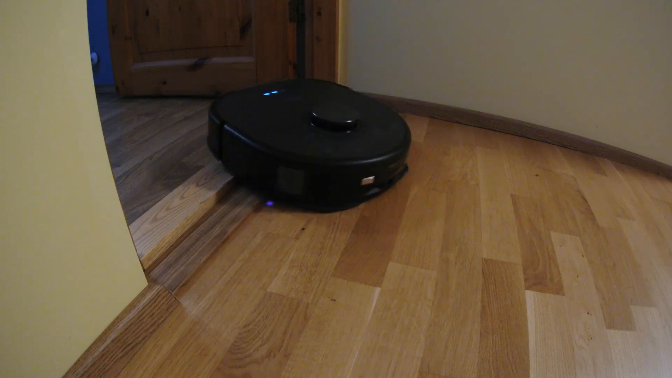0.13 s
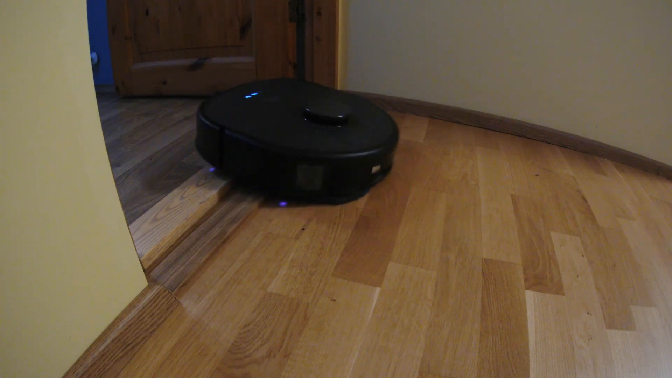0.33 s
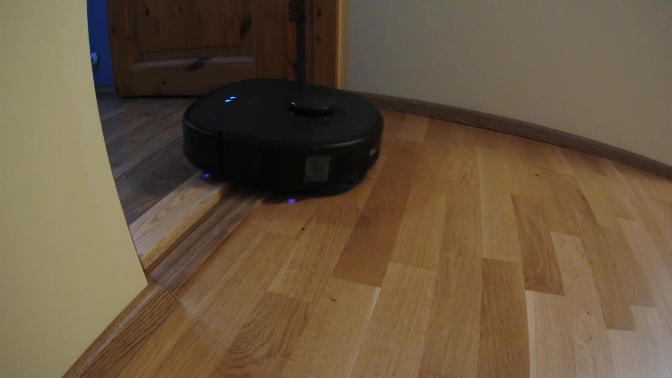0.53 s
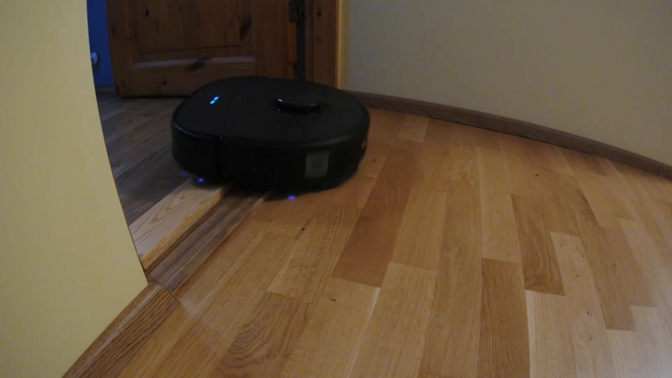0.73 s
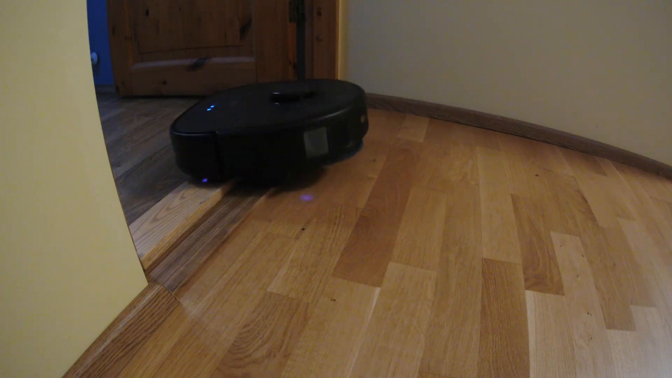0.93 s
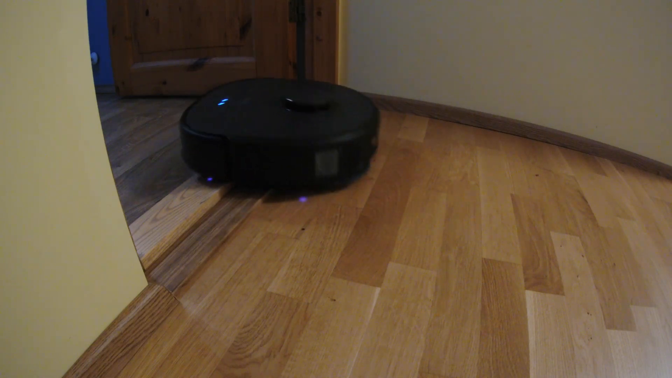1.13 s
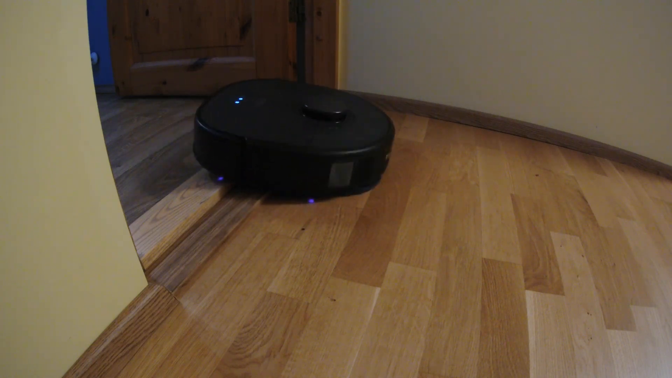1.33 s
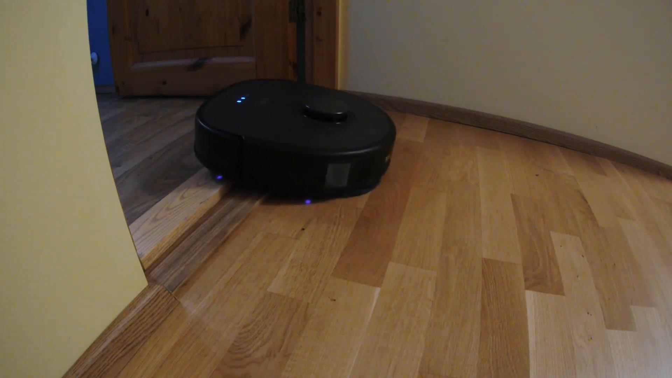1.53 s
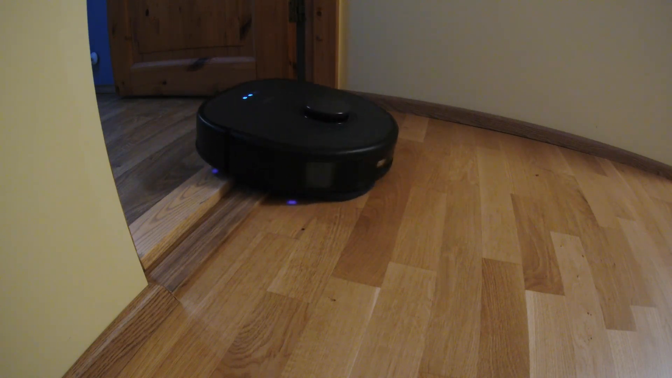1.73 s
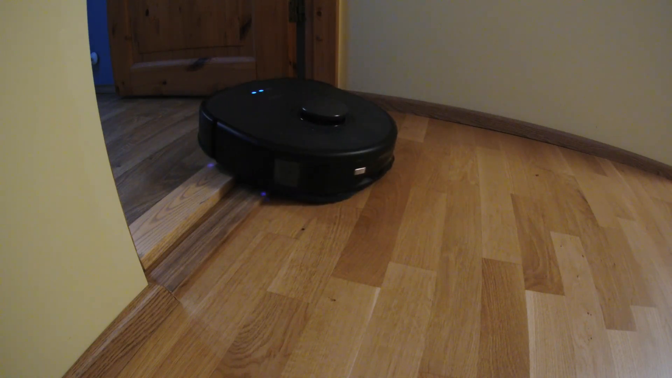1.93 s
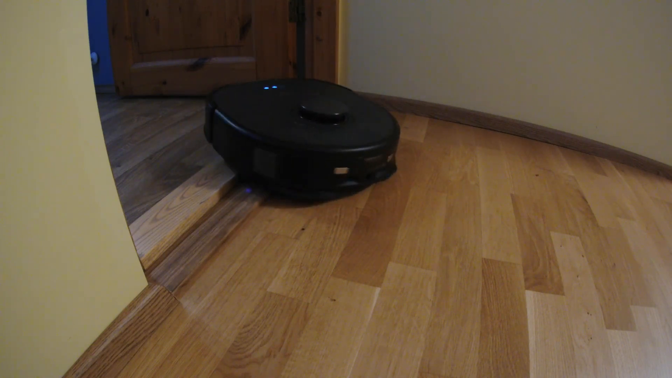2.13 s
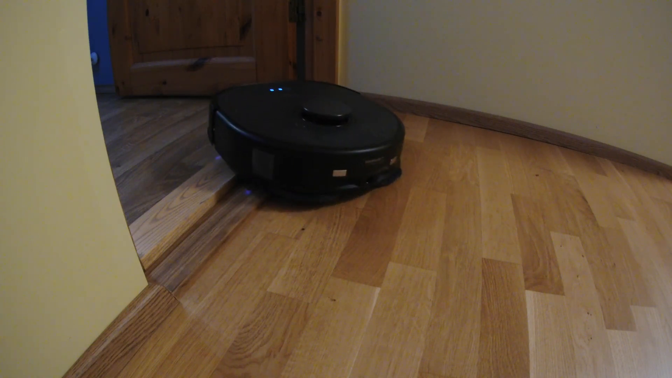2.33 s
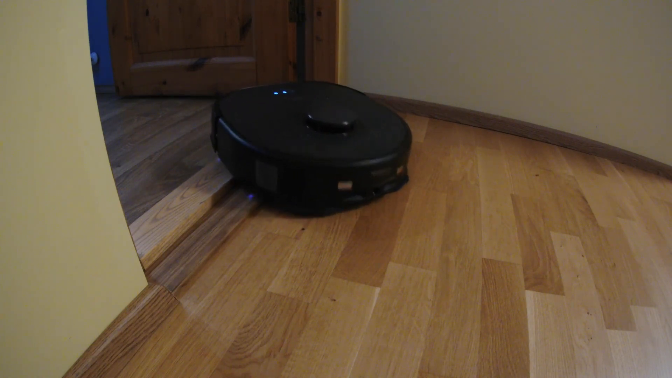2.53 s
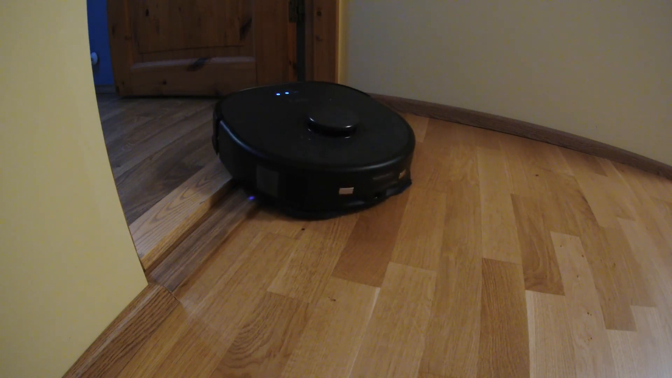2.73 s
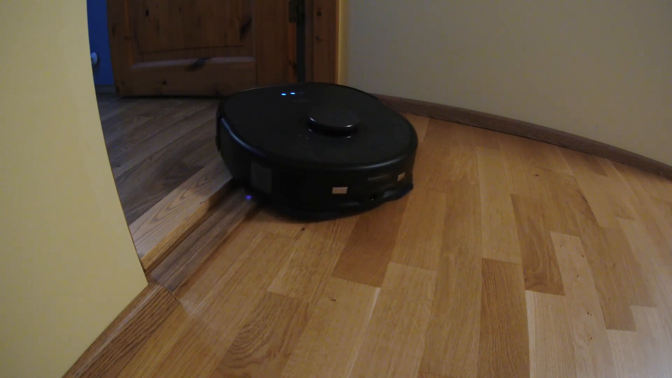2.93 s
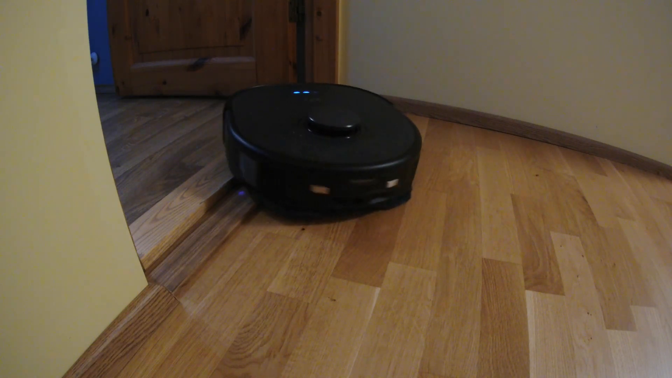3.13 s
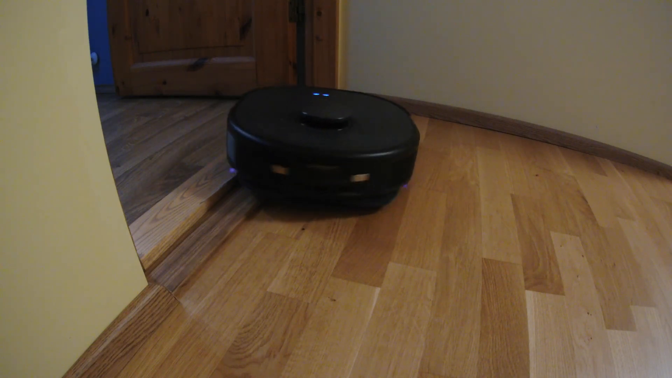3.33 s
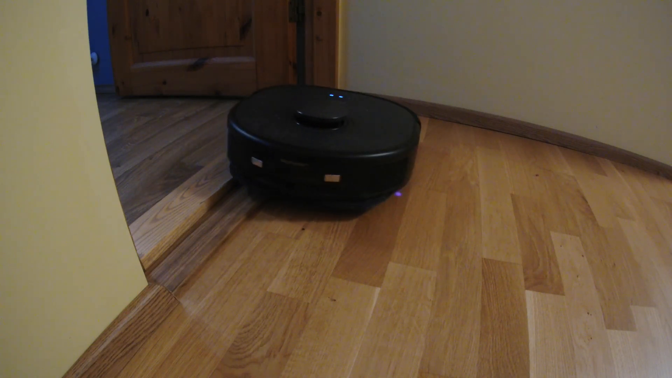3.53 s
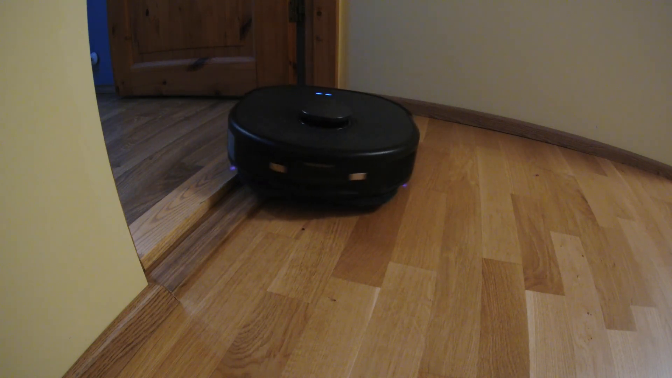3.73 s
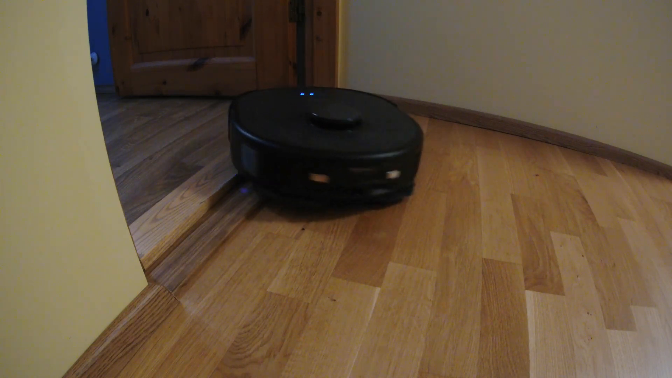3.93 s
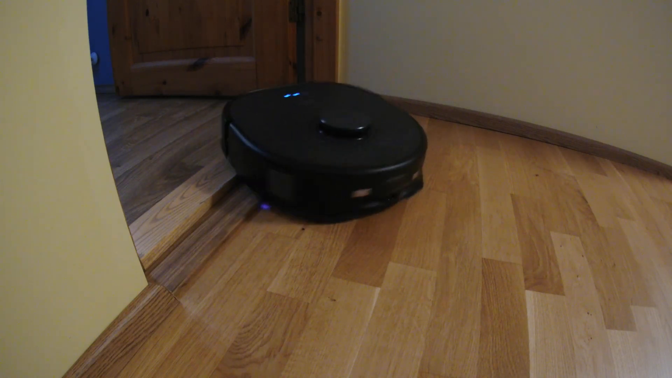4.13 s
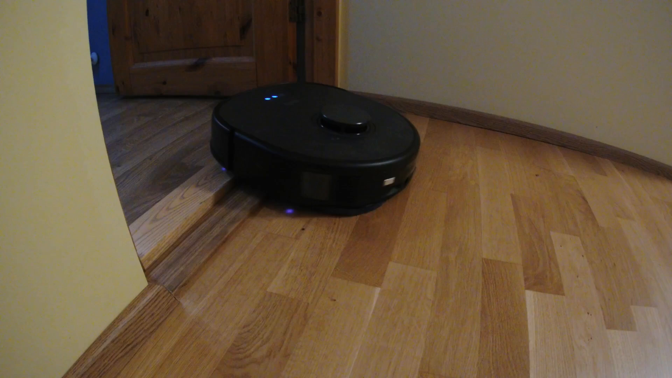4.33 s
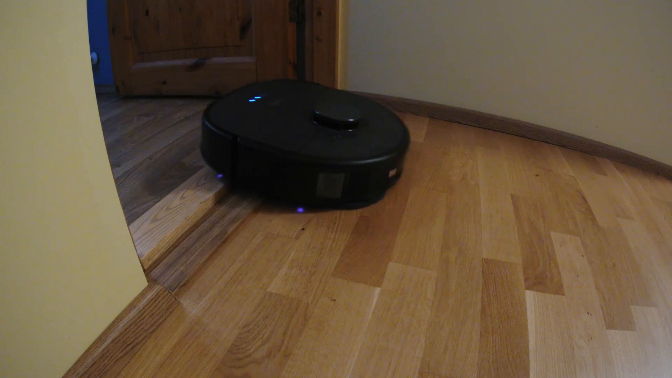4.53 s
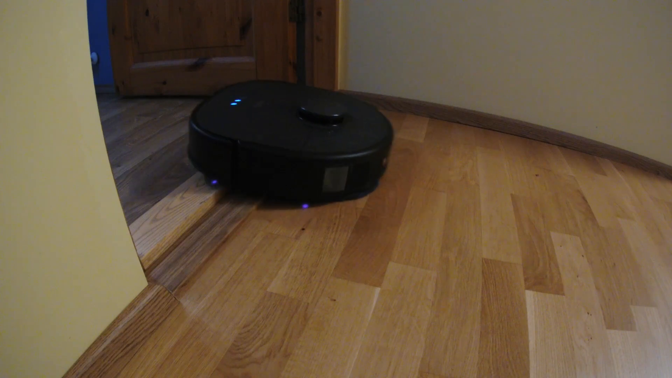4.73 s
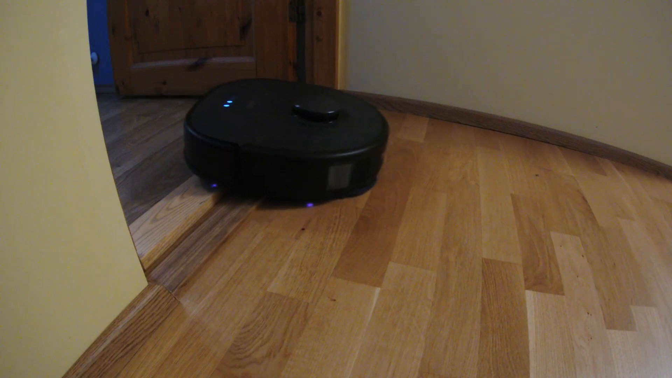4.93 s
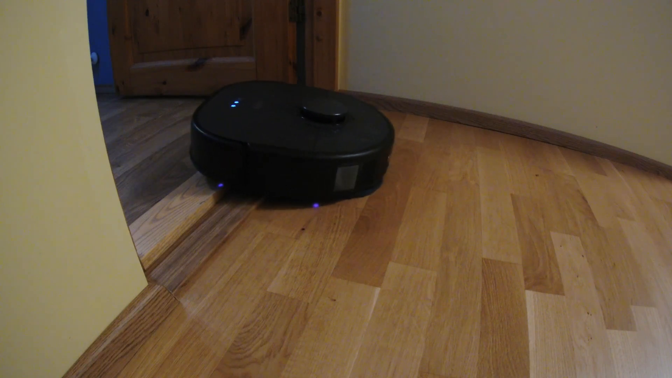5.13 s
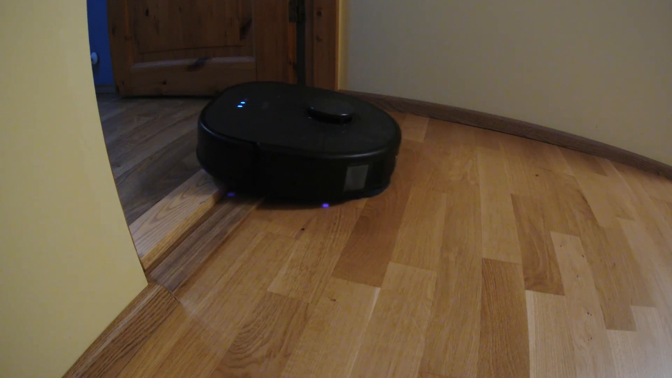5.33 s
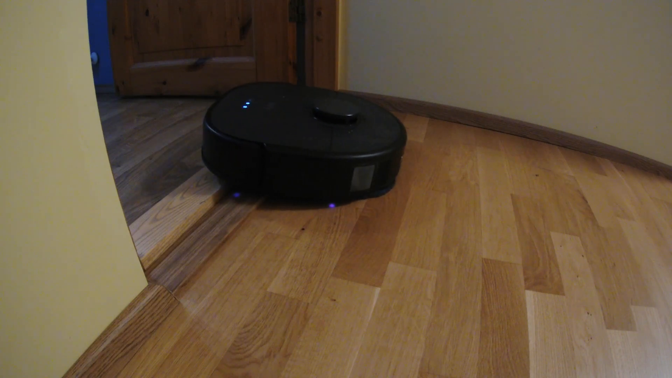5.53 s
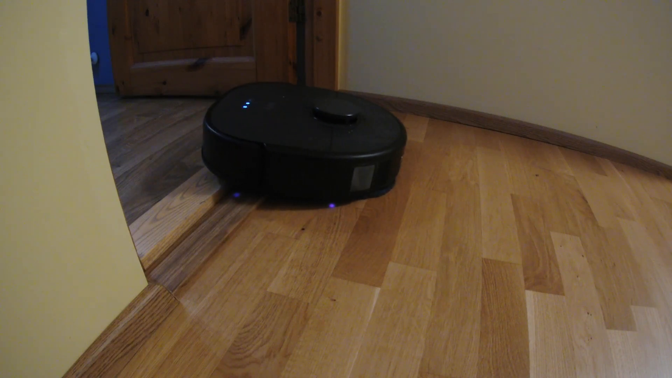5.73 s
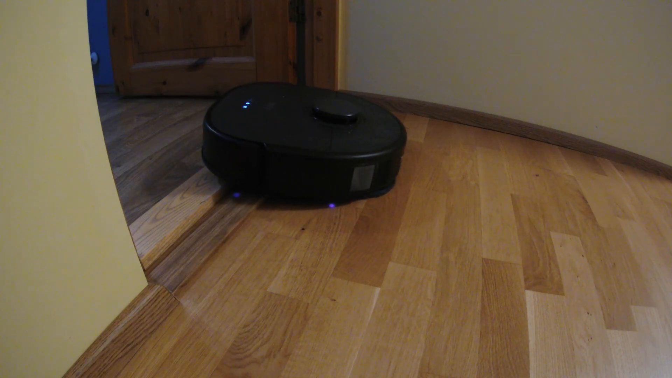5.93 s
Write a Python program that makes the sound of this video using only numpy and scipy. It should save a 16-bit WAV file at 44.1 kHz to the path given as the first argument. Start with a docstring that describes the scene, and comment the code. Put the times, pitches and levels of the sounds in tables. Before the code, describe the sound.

In a small hallway with a wooden floor, a robot vacuum works at a door-sill ramp, heard close and straight ahead. A soft motor whirr with a thin, high whistle runs throughout. From 0 to 0.8 seconds gears whine unsteadily and treads scrub, with a double plastic knock near 0.4 and a faint squeal; a dull knock and light bristle hiss follow around 0.8 to 1.1. At 1.3 a quick rattle ends in a loud, sharp crack. From 1.5 to 3.2 it is mostly quiet whirring with tiny tyre bumps. At 3.3 a run of clacks bursts out with rumbling and scrubbing, then a knock at 3.7. From 3.9 to 4.2 clicks clatter densely over straining gears, with heavy knocks at 4.4 and 4.6 and a final tight cluster at 4.9. Short squeals occur near 4.3 and 4.75. Afterwards only quiet whirring and faint whistling remain until 6.

```python
"""The plastic shell of a robot vacuum knocks and clatters on a wooden ramp at a door sill, in a small hallway.
Each blow is a short force that rings shell and ramp, then the near surfaces and the hall answer.
The robot turns and climbs: wheel gears whine under load as harmonic tones and squeal briefly as rough sines,
and tyres and brush rumble, scrub and hiss on the wood as coloured noise. The motors hum, whirr and whistle
quietly throughout. The robot is heard straight ahead in stereo, over a parquet floor."""
import sys
import numpy as np
from scipy import signal
from scipy.fft import rfft, irfft, next_fast_len
from scipy.io import wavfile
from scipy.ndimage import uniform_filter1d, map_coordinates

SR = 44100
rng = np.random.default_rng(int(sys.argv[2]) if len(sys.argv) > 2 else 0)


def store_wav(level_fs):
    """Save 16-bit WAV to argv[1]."""
    pcm = np.round(np.clip(np.atleast_2d(level_fs), -1, 1) * 32767)
    wavfile.write(sys.argv[1], SR, pcm.T.astype(np.int16))


N = 268392

# Shell striking the ramp: (time [s], relative level [dB], brightness [dB per octave],
# limit above which the contact is too soft to ring [Hz], chatter [s], ring of the struck spot [Hz])
SHELL_KNOCKS = [(.37, -2, -.5, 2700, 0.0016, 453), (.391, -5.5, -1.5, 1910, 0.0076, 730),
                (.837, -15.5, 0, 1380, 0.0024, 890), (1.282, -15, -3, 8000, 0.0024, 450),
                (1.2895, -7.5, 0.5, 9600, .0012, 940), (1.295, -7.5, -1, 5000, 0.015, 900),
                (1.314, 8, 2.5, 3520, 0.00013, 536), (2.146, -21.5, -3, 5870, 0.0023, 474),
                (3.269, -0.5, -6, 7960, 0.0023, 660), (3.283, -8, -2, 8600, 0.0035, 430),
                (3.323, -8, -4, 9000, 0.012, 420), (3.366, -6, -1, 9400, 0.0019, 690),
                (3.423, -11, -3, 9000, 0.006, 915), (3.698, -6.5, -2, 1480, 0.0021, 625),
                (3.927, 0, -2.5, 9300, 0.003, 990), (3.94, -5.5, -3, 7000, 0.011, 390),
                (3.992, -13, -1.5, 10000, 0.0034, 694), (4.004, -4, -10.5, 9000, 0.0023, 880),
                (4.031, -9, -11.5, 9000, 0.019, 830), (4.066, -6, -1.5, 9300, .0054, 910),
                (4.076, -6, 0, 6000, 0.0062, 1650), (4.122, -9, -6.5, 6000, 0.0029, 980),
                (4.177, -9.5, -0.5, 10200, 0.0027, 920), (4.192, -4, -7.5, 8000, 0.0086, 875),
                (4.368, 0, -4, 7000, 0.0026, 920), (4.374, 7.5, 5, 1390, 0.005, 927),
                (4.605, -3.5, -3.5, 2550, 0.0041, 626), (4.608, 3, 3, 2590, 0.00051, 1400),
                (4.914, -9, -0.5, 3500, 0.007, 726), (4.938, -2, 1, 4000, 0.00044, 476),
                (4.941, -1.5, -2, 7400, 0.0032, 705), (4.9603, 1, -2, 3180, 0.00029, 506)]
# Rubber tyres dropping over edges: (time [s], relative level [dB], ring of the struck spot [Hz])
TYRE_BUMPS = [(.129, -23.5, 940), (.587, -18, 493), (.753, -19.5, 446), (.78, -18, 410), (1.317, -11, 185),
              (1.689, -16, 416), (1.97, -26, 274), (2.189, -21.5, 880), (2.6, -28, 714),
              (4.832, -25.5, 425), (4.965, -17, 200)]
BUMP_TILT_DB, BUMP_SOFT_HZ, BUMP_CHATTER_S = -8, 5000, 0.0025  # dull (dB per octave), soft and slow
# What the shell radiates: (frequency [Hz], relative level [dB])
SHELL_RADIATION = [(30, -29.5), (80, -44), (130, -22), (190, -18.5), (300, -11), (420, -1), (1000, -1.5),
                   (3400, -2), (4300, -3.5), (5200, 1), (7200, 2.5), (10000, -4.5), (15000, -9.5)]
# Resonances of shell and ramp: (frequency [Hz], width [Hz], level over the plain blow [dB])
SHELL_MODES = [(181, 10, -5), (221, 16.8, 8.5), (294.6, 11, 4), (427, 27, -1), (480, 26, -27),
               (580, 41, -6), (731, 49, 4.5), (979, 90, -0.5), (1380, 190, -2.5), (1606, 30, 0),
               (2018, 12, 3.5), (2740, 324, 2.5), (3180, 440, -3), (3700, 160, -1)]
MODE_SPACING_HZ = 192.2  # between the shell's lesser modes
# Decay of the hallway: (frequency [Hz], time to fall 60 dB [s])
HALL_DECAY = [(100, 0.25), (230, 0.34), (450, 0.23), (2500, 0.22), (6000, 0.21), (12000, .16)]
# Colour of the hall sound against the direct sound: (frequency [Hz], relative level [dB])
HALL_COLOUR = [(200, 0.5), (450, 1), (1500, -3.5), (3000, -5), (6500, -0.5), (12000, -3.5)]

# Wheel gears in the two swings at the ramp: (time [s], tooth rate [Hz]); the fundamental sounds 1 % lower
FIRST_SWING_RATE = [(0.0, 873.8), (0.054, 968.4), (0.26, 960.4), (0.342, 1030), (0.424, 866.3),
                    (0.444, 935.0), (0.516, 1063), (0.57, 1017), (0.63, 772.2), (0.716, 1007), (0.75, 1042),
                    (0.8, 966.3)]
SECOND_SWING_RATE = [(3.44, 886), (3.552, 906.0), (3.568, 968.0), (3.67, 907), (3.758, 663.1),
                     (3.872, 780.4), (3.982, 833.6), (4.048, 964.1), (4.114, 936.7), (4.166, 1002),
                     (4.2, 917), (4.268, 1104), (4.41, 920), (4.464, 973.7), (4.636, 907), (4.664, 812),
                     (4.716, 1014), (4.766, 1047), (4.85, 917)]
# Wheels pushing under load, before the chassis:
# (time [s], hold [s], fundamental level [dB], reference level of the overtones [dB])
GEAR_STRAINS = [(0.082, 0.22, -62, -67.5), (0.42, 0.032, -65.5, -65), (.52, .18, -66.5, -78),
                (3.435, .02, -59, -86), (4.01, 0.46, -62, -60), (4.458, 0.091, -51, -60.5),
                (4.661, .015, -77, -63.5)]
GEAR_RISE_DB_PER_S, GEAR_FALL_DB_PER_S = 58, 72
# Gear overtones: (multiple of the tooth rate, level against the reference [dB])
GEAR_OVERTONES = [(2, 0.5), (3, -3), (4, -9), (5, -13.5), (6, -15), (7, -45)]
# Brief, rough gear squeals, mostly near 4.2 kHz:
# (middle [s], half length [s], pitch [Hz], reference level of each of two sines [dB])
GEAR_SQUEALS = [(0.376, 0.045, 4190, -66), (0.515, .055, 4180, -64.5), (3.5, 0.033, 5860, -65),
                (4.322, 0.068, 4400, -63), (4.752, 0.04, 4170, -62.5)]

# Treads rumbling over the ramp, before the chassis: (time [s], hold [s], level [dB])
TREAD_ROLLS = [(.55, 0.21, -64.5), (1.72, 0.14, -65), (3.31, 0.027, -48.5), (4.0, 0.024, -48.5),
               (4.23, 0.054, -62.5), (4.82, 0.16, -63)]
ROLL_IDLE_DB, ROLL_RISE_DB_PER_S, ROLL_FALL_DB_PER_S = -77, 189, 148
# Colour of the rumble: (frequency [Hz], relative density [dB per Hz])
ROLL_COLOUR = [(40, -43), (110, -53), (200, -5), (420, 2.5), (900, -1), (1500, -8), (3000, -6), (5000, -24),
               (15000, -36)]
# Treads scrubbing sideways as the robot pivots: (time [s], hold [s], reference level [dB])
TREAD_SCRUBS = [(.25, 0.44, -64), (1.22, 0.037, -66), (1.78, 0.049, -64.5), (3.39, 0.13, -51),
                (3.98, 0.012, -49.5), (4.31, 0.054, -56), (4.6, 0.21, -62.5)]
SCRUB_IDLE_DB, SCRUB_RISE_DB_PER_S, SCRUB_FALL_DB_PER_S = -68, 89, 46
# Colour of the scrubbing: (frequency [Hz], relative density [dB per Hz])
SCRUB_COLOUR = [(200, -16), (1500, 2), (3200, 0), (4400, 2.5), (6000, 4), (8000, -3), (9500, -7),
                (12500, -10.5), (15500, -17)]

# Bristles on the sill: (time [s], hold [s], level [dB])
BRUSH_SWISHES = [(.8, .32, -72.5)]
SWISH_SLOPE_DB_PER_S = 43
# Colour of the bristles: (frequency [Hz], relative density [dB per Hz])
BRISTLE_COLOUR = [(3000, -45), (7200, -18), (7800, 0), (8200, -3), (8750, -8), (9400, -7), (10200, -26),
                  (15000, -38)]

# Motor tones, before the chassis: (frequency [Hz], level [dB])
MOTOR_HUM = [(479, -80), (867, -76.5), (1351, -81), (1669, -85), (2110, -82.5), (2482, -77), (4850, -97)]
# Colour of the running noise: (frequency [Hz], relative density [dB per Hz])
MOTOR_WHIRR = [(25, -29), (45, -10.5), (75, -24.5), (135, -67), (216, -19), (371, -5), (473, 0), (560, -10),
               (881, -2), (1180, -5), (2390, -7), (3700, -12), (8000, -20.5), (10500, -27), (15800, -26)]
# Motor drive whistling louder for a while, before the chassis: (time [s], hold [s], level [dB])
DRIVE_WHISTLES = [(.85, .33, -74.5), (1.87, .2, -72), (2.25, .45, -78), (2.8, .35, -72.5), (5.62, .15, -78)]
WHISTLE_HZ, WHISTLE_IDLE_DB, WHISTLE_SLOPE_DB_PER_S = 4056, -83, 152
# Chassis resonances, shared by all that runs inside: (frequency [Hz], width [Hz], level over the plain sound [dB])
CHASSIS_MODES = [(1490, 230, -11.5), (4270, 37, -22), (4860, 44, 4.5), (5810, 170, -9), (6150, 130, -3.5),
                 (7850, 340, -8), (8730, 400, -6), (12700, 390, -22)]

# Chosen stereo width, nearly mono in the mids, wider in the treble for running sounds:
# (frequency [Hz], side minus mid [dB])
BLOW_WIDTH = [(60, -17), (130, -35), (290, -51), (640, -43), (1410, -46), (3100, -44), (6820, -30),
              (15000, -37)]
RUNNING_WIDTH = [(60, -12), (130, -28), (290, -50), (640, -38), (1410, -100), (3100, -10), (6820, -7),
                 (15000, -4.5)]
TOP_HZ = 15800  # top of the sound's band


def contact_force(chatter_s, clean_s):
    """A contact is a clean blow plus the chatter of loose plastic."""
    t = np.arange(8192) / SR
    # the chatter swells as the parts meet, then dies
    envelope = np.exp(-t / (2 * chatter_s)) * (1 - np.exp(-3 * t / chatter_s))
    chatter = rng.standard_normal(len(t)) * envelope
    clean_share = 1 / (1 + (chatter_s / clean_s) ** 2)  # short contacts are mostly one clean blow
    force = np.sqrt(1 - clean_share) * chatter / np.linalg.norm(chatter)
    force[0] += np.sqrt(clean_share)
    return force


def near_paths(size, near_db):
    """The direct sound, then floor and door frame over paths about 0.1 to 1.1 m longer."""
    near = np.r_[1, np.zeros(size - 1)]
    delays = rng.integers(SR // 4000, SR // 300, size=4)
    near[delays] += amp(near_db) * rng.choice([-1, 1], size=4)
    return near


def knocks(room_db, clean_s, level_db, spot_db, spot_width_hz, build_s, lag_s, near_db, snap_db, uneven_db):
    """Each shell knock or tyre bump rings shell and ramp through bending waves, and the hall answers."""
    size = 16384
    out = np.zeros(N + size)
    hz = np.fft.rfftfreq(size, 1 / SR)
    body = 1 + sum(amp(db) * resonance(hz, centre, width) for centre, width, db in SHELL_MODES)
    wet = causal(amp(room_db + along(HALL_COLOUR, hz)))
    shell_db = along(SHELL_RADIATION, hz)
    # bending waves are slower in the bass: 1 kHz arrives lag_s late, the treble sooner
    bending = np.exp(-4j * np.pi * lag_s * np.sqrt(1000 * hz))
    octaves = np.log2(np.clip(hz, 400, 6400) / 1000)
    bumps = [(s, db, BUMP_TILT_DB, BUMP_SOFT_HZ, BUMP_CHATTER_S, spot_hz) for s, db, spot_hz in TYRE_BUMPS]
    for s, db, tilt_db, soft_hz, chatter_s, spot_hz in list(SHELL_KNOCKS) + bumps:
        force = contact_force(chatter_s, clean_s)
        paths = rfft(near_paths(size, near_db)) + wet * rfft(hallway(build_s), size)
        # a soft contact keeps only a faint snap of its treble
        softness = 1 / np.sqrt(1 + (hz / soft_hz) ** 8)
        # every spot favours other modes of the shell
        uneven = uneven_db * np.interp(hz / MODE_SPACING_HZ, np.arange(400), rng.standard_normal(400))
        colour = causal(amp(db + tilt_db * octaves + shell_db + uneven) * (softness + amp(snap_db)))
        ring = body + amp(spot_db) * resonance(hz, spot_hz, spot_width_hz)
        out[round(s * SR):][:size] += irfft(rfft(force, size) * colour * ring * bending * paths)
    return amp(level_db) * out[:N]


def gears(rough_db, smear):
    """Meshing teeth whine at a rate that sags and recovers with the load on the wheels."""
    hz, = curves(list(FIRST_SWING_RATE) + list(SECOND_SWING_RATE))
    fundamental_rows = [(s, hold, db) for s, hold, db, _ in GEAR_STRAINS]
    overtone_rows = [(s, hold, db) for s, hold, _, db in GEAR_STRAINS]
    fundamental = swells(fundamental_rows, GEAR_RISE_DB_PER_S, GEAR_FALL_DB_PER_S)
    upper = swells(overtone_rows, GEAR_RISE_DB_PER_S, GEAR_FALL_DB_PER_S)
    # uneven teeth jitter the phase, which blurs the overtones more than the fundamental
    phase = 2 * np.pi * np.cumsum(hz) / SR + smear * (wobble(170) + wobble(46))

    def partial(k):
        return unit(np.sin(k * phase) * amp(rough_db * wobble(110)))

    overtones = sum(amp(db) * partial(k) for k, db in GEAR_OVERTONES)
    return fundamental * partial(0.99) + upper * overtones


def gear_squeals():
    """The gears squeal briefly and roughly: two unsteady sines near one pitch."""
    t = np.arange(N) / SR
    out = np.zeros(N)
    for s, half, hz, db in GEAR_SQUEALS:
        envelope = np.exp(-((t - s) / half) ** 4)
        rasp = unit(amp(1.1 * wobble(400)))
        pair = tone(hz, waver=.016, flutter_db=5.5) + tone(hz, waver=0.02, flutter_db=5)
        out += amp(db) * envelope * rasp * pair
    return out


def tyres(slip_db, grit_db, grit_rate):
    """Treads rumble over the boards and scrub in small slips; some slips snap as tiny ticks."""
    rolling = np.hypot(amp(ROLL_IDLE_DB), swells(TREAD_ROLLS, ROLL_RISE_DB_PER_S, ROLL_FALL_DB_PER_S))
    scrubbing = np.hypot(amp(SCRUB_IDLE_DB), swells(TREAD_SCRUBS, SCRUB_RISE_DB_PER_S, SCRUB_FALL_DB_PER_S))
    rumble = rush(ROLL_COLOUR, grain_db=-1.0, grain_rate=97, patchy_db=6.0)
    roll = rolling * amp(0.63 * wobble(30)) * rumble
    slips = rush(SCRUB_COLOUR, grain_db=1.5, grain_rate=440, patchy_db=4.2)
    snaps = (rng.random(N) < grit_rate / SR) * rng.standard_normal(N)
    burst = rng.standard_normal(SR // 100) * np.exp(-np.arange(SR // 100) / SR / .0012)
    ticks = signal.fftconvolve(snaps, burst)[:N]
    grit = unit(filtered(ticks, lambda hz: amp(along(SCRUB_COLOUR, hz))))
    scrub = amp(slip_db) * slips + amp(grit_db) * grit
    return roll + scrubbing * amp(0.31 * wobble(40)) * scrub


def brush():
    """Bristles hiss evenly along the sill while the robot tips forward."""
    hiss = rush(BRISTLE_COLOUR, grain_db=1.5, grain_rate=400, patchy_db=.7)
    return swells(BRUSH_SWISHES, SWISH_SLOPE_DB_PER_S, SWISH_SLOPE_DB_PER_S) * hiss


def motors(whirr_db, whistle_hz):
    """A soft steady whirr of noise with a few wavering tones and a thin whistle."""
    hum = sum(amp(db) * tone(hz, waver=0.00476, flutter_db=1.6) for hz, db in MOTOR_HUM)
    louder = swells(DRIVE_WHISTLES, WHISTLE_SLOPE_DB_PER_S, WHISTLE_SLOPE_DB_PER_S)
    whistle = np.hypot(amp(WHISTLE_IDLE_DB), louder) * tone(whistle_hz, waver=0.00055, flutter_db=4.0)
    noise = rush(MOTOR_WHIRR, grain_db=0.9, grain_rate=130, patchy_db=2.0)
    return amp(whirr_db + 1.16 * wobble(8)) * noise + hum + whistle


def chassis(x):
    """The chassis resonances colour the sound from inside the robot."""
    return filtered(x, lambda hz: 1 + sum(amp(db) * resonance(hz, c, w) for c, w, db in CHASSIS_MODES))


def hallway(build_s):
    """A fresh room tail of energy 1: reflections build up, then die at a rate set by frequency."""
    hz, t, z = signal.stft(rng.standard_normal(SR // 3), SR, nperseg=256)
    decay = amp(-60 * t / along(HALL_DECAY, hz)[:, None])
    tail = signal.istft(z * decay, SR, nperseg=256)[1]
    tail = tail * (1 - np.exp(-np.arange(len(tail)) / SR / build_s))
    return tail / np.linalg.norm(tail)


def stereo(x, width, scatter_s):
    """Both channels carry x; a scattered copy, opposite in sign in each, sets the chosen width."""
    t = np.arange(SR // 4) / SR
    scatter = rng.standard_normal(len(t)) * t * np.exp(-t / scatter_s)
    side = signal.fftconvolve(x, scatter / np.linalg.norm(scatter))[:N]
    side = filtered(side, lambda hz: amp(along(width, hz)))
    return np.array([x + side, x - side])


def rush(spectrum, grain_db, grain_rate, patchy_db):
    """Coloured noise of rms 1, grainy in time, with brief patches of stronger ringing."""
    grainy = rng.standard_normal(N) * amp(grain_db * wobble(grain_rate))
    z = signal.stft(grainy, nperseg=512)[2]
    patches = uniform_filter1d(rng.standard_normal(z.shape), size=3, axis=0)  # across frequency
    patches = uniform_filter1d(patches, size=14, axis=1)  # across time
    noise = signal.istft(z * amp(patchy_db * unit(patches)), nperseg=512)[1][:N]
    return unit(filtered(noise, lambda hz: amp(along(spectrum, hz))))


def tone(hz, waver, flutter_db):
    """A sine of rms 1 that wavers in pitch and level."""
    phase = 2 * np.pi * np.cumsum(hz * (1 + waver * wobble(60))) / SR
    return unit(np.sin(phase) * amp(flutter_db * wobble(30)))


def swells(rows, rise_db_per_s, fall_db_per_s):
    """Gain of (s, hold s, dB) events that fade in up to their time, hold and fade out; powers add."""
    t = np.arange(N) / SR
    each = []
    for s, hold, db in rows:
        rise = rise_db_per_s * np.maximum(s - t, 0)
        fall = fall_db_per_s * np.maximum(t - s - hold, 0)
        each.append(amp(db - rise - fall))
    return np.linalg.norm(each, axis=0)


def resonance(hz, centre, width):
    """A causal resonance of gain 1 at its centre."""
    return 1j * hz * width / (centre ** 2 - hz ** 2 + 1j * hz * width)


def causal(gain):
    """The minimum-phase response with this gain: nothing sounds before the blow."""
    cepstrum = irfft(np.log(np.maximum(gain, 1e-6)))
    half = len(cepstrum) // 2
    return np.exp(rfft(np.r_[cepstrum[0], 2 * cepstrum[1:half], np.zeros(half)]))


def filtered(x, response):
    """x times a response of frequency."""
    m = next_fast_len(N + SR // 2)
    return irfft(rfft(x, m) * response(np.fft.rfftfreq(m, 1 / SR)), m)[..., :N]


def wobble(rate):
    """A smooth random curve, rate knots a second."""
    knots = rng.standard_normal(int(N * rate / SR) + 4)
    return map_coordinates(knots, [np.arange(N) * rate / SR])


def curves(rows):
    """One value per sample for each column after the time."""
    s, *cols = np.transpose(rows)
    return [np.interp(np.arange(N) / SR, s, c) for c in cols]


def along(points, hz):
    """(Hz, value) points read on a log frequency axis."""
    f, v = np.transpose(points)
    return np.interp(np.log(hz + 1), np.log(f + 1), v)


def amp(db):
    """Decibels to gain."""
    return 10 ** (np.asarray(db) / 20)


def unit(x):
    """x at rms 1."""
    return x / np.sqrt(np.mean(x ** 2) + 1e-20)


def scene():
    """The robot's blows, gears, tyres, brush and motors, straight ahead."""
    blows = knocks(room_db=-.5, clean_s=0.0012, level_db=-4.5, spot_db=6.5, spot_width_hz=77,
                   build_s=0.0016, lag_s=0.00069, near_db=-10, snap_db=-40.5, uneven_db=2.5)
    drive = gears(rough_db=3.0, smear=0.28) + motors(whirr_db=-65.5, whistle_hz=WHISTLE_HZ)
    treads = tyres(slip_db=-5.0, grit_db=-18.5, grit_rate=450)  # ticks per second
    running = chassis(drive + treads) + brush() + gear_squeals()
    return stereo(blows, BLOW_WIDTH, scatter_s=0.0063) + stereo(running, RUNNING_WIDTH, scatter_s=0.016)


def record(dry):
    """Nothing is rendered above TOP_HZ, the top of the sound's band."""
    return filtered(dry, lambda hz: hz < TOP_HZ)


dry = scene()
out = record(dry)
store_wav(out)
```